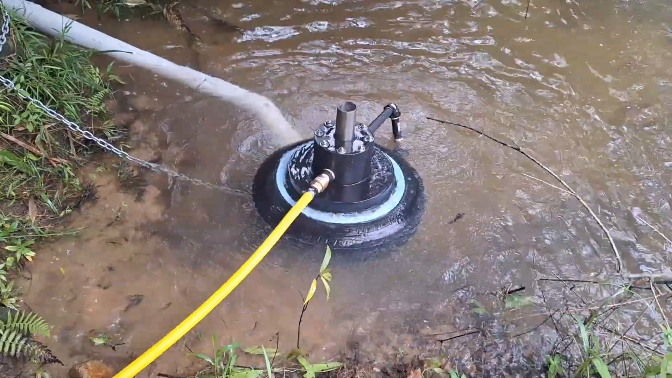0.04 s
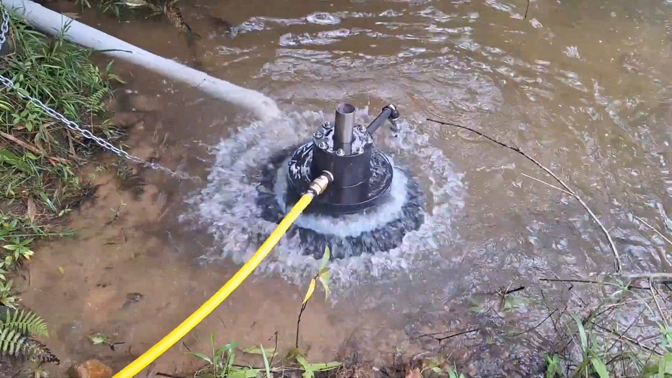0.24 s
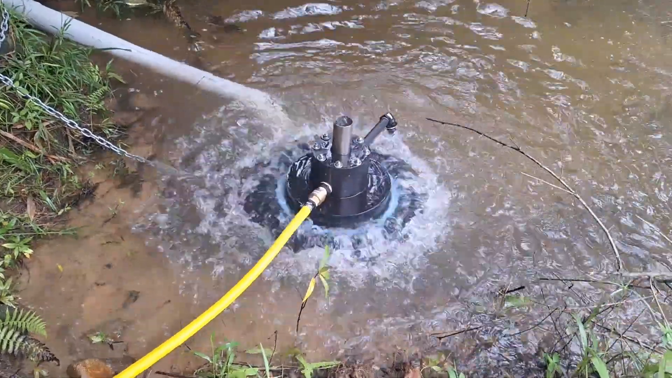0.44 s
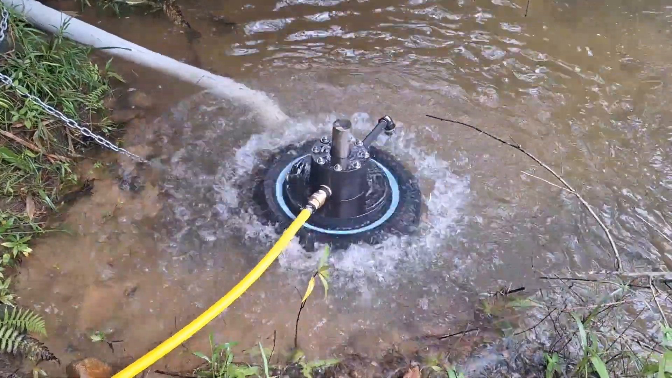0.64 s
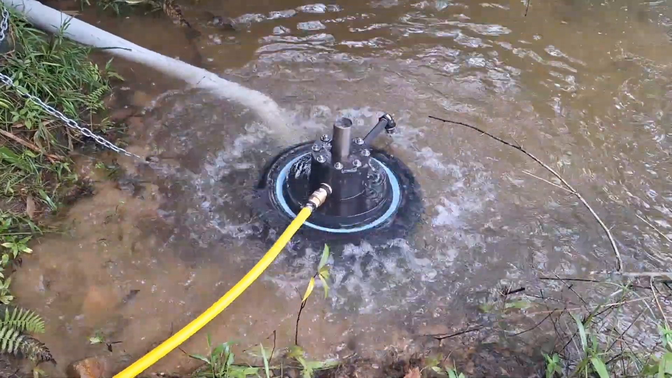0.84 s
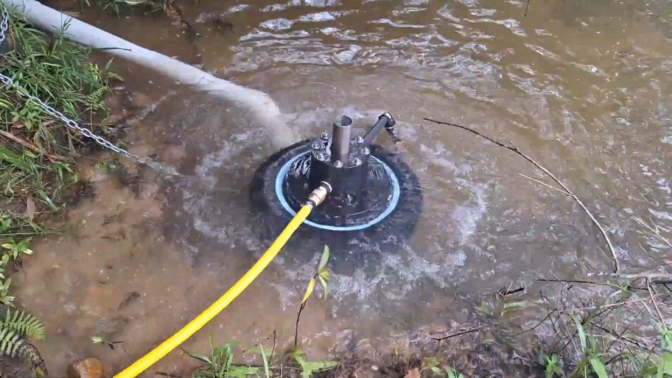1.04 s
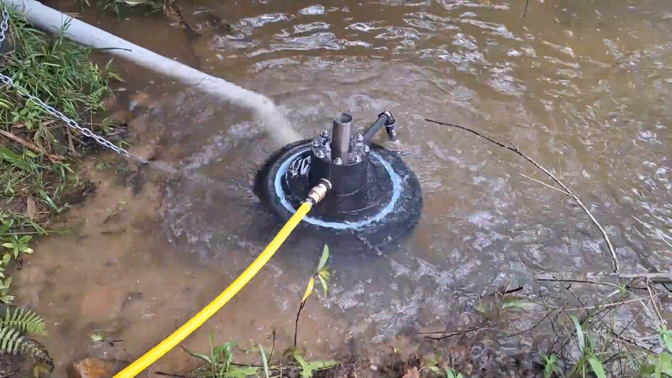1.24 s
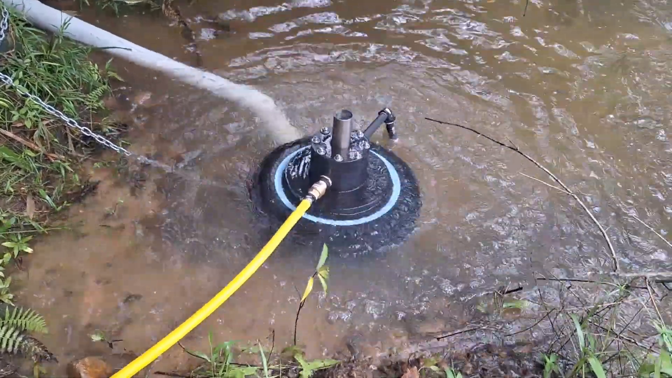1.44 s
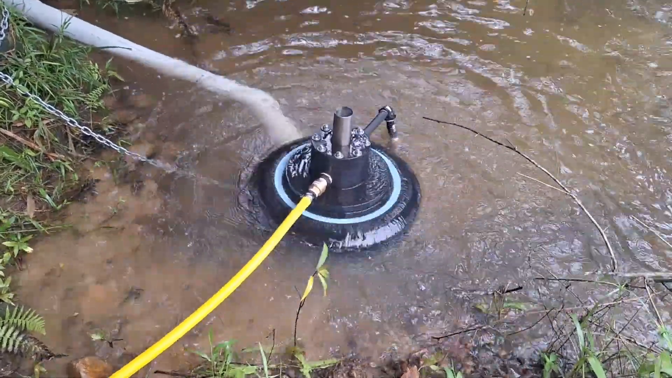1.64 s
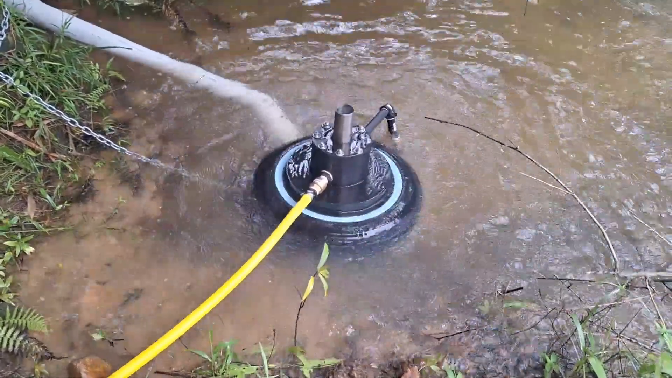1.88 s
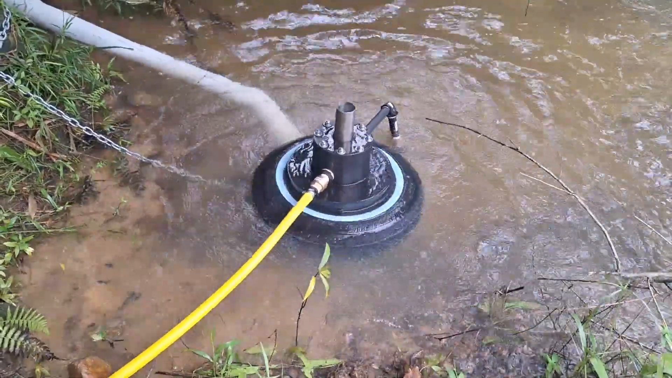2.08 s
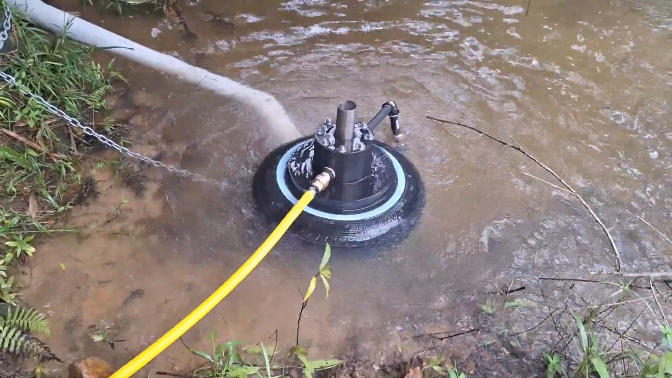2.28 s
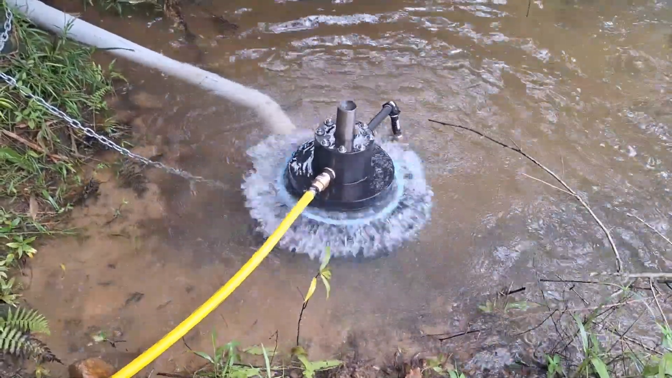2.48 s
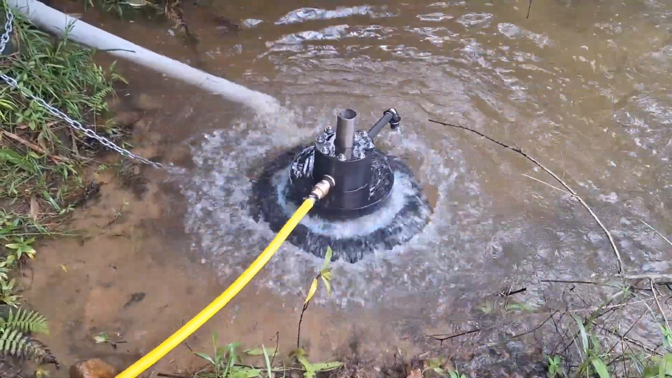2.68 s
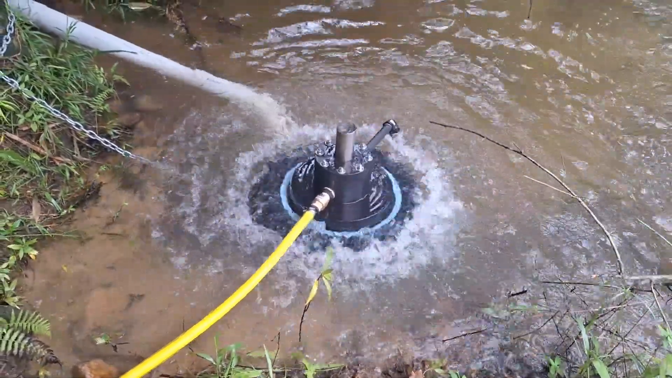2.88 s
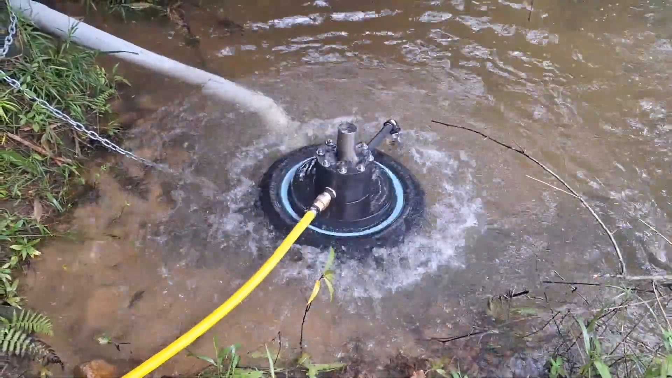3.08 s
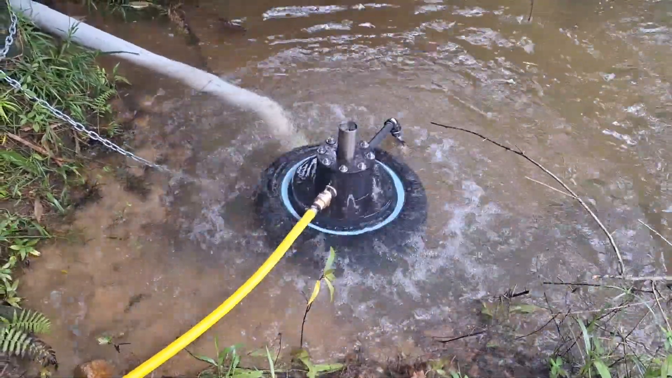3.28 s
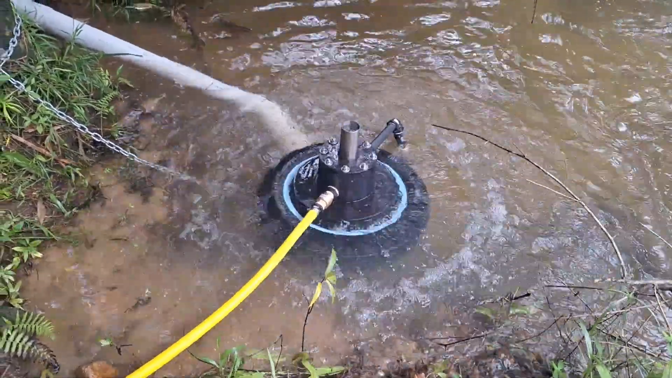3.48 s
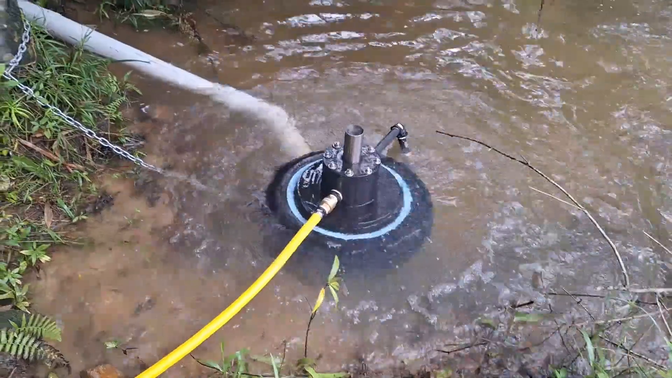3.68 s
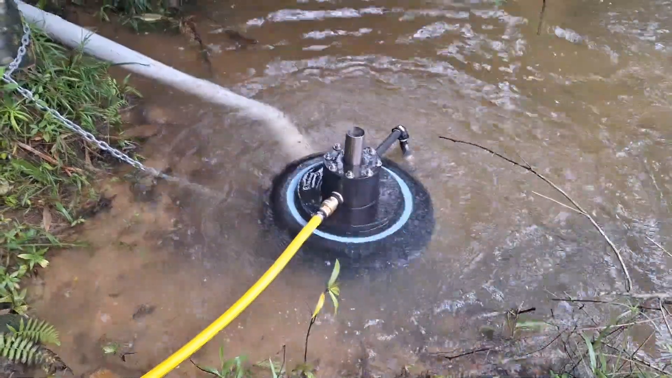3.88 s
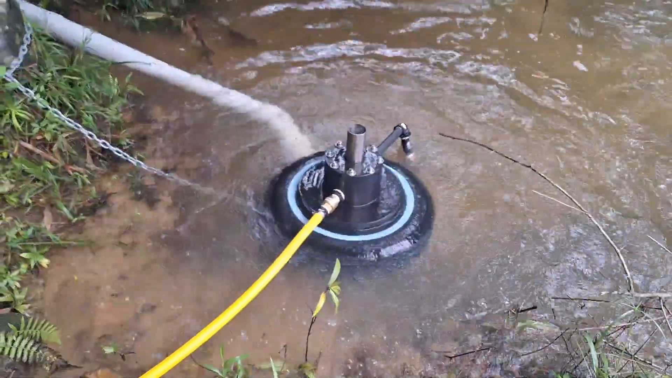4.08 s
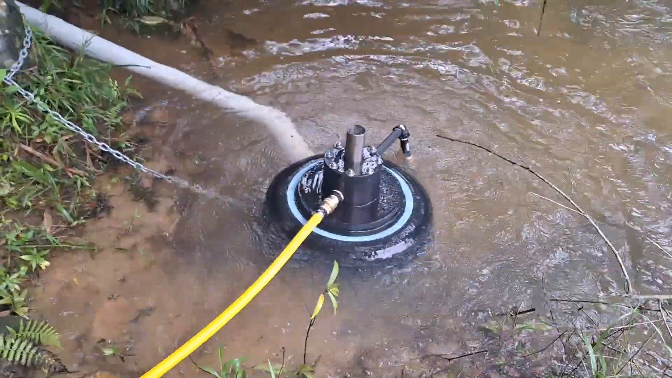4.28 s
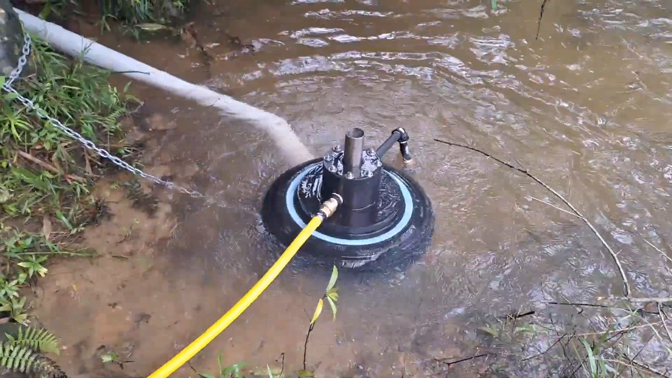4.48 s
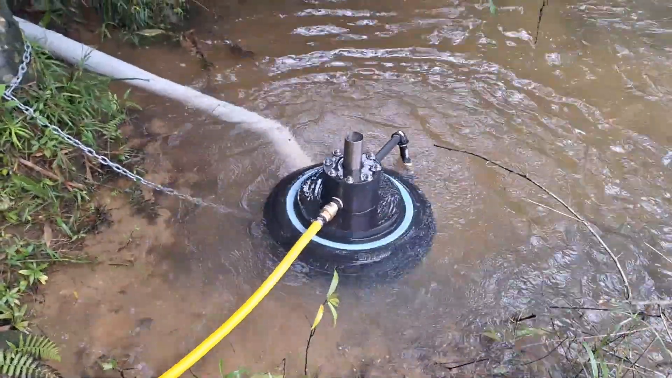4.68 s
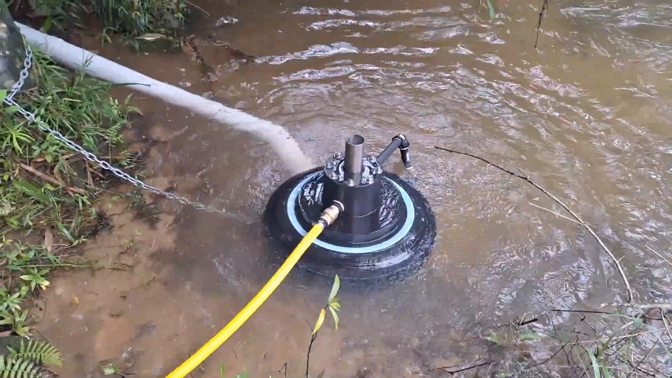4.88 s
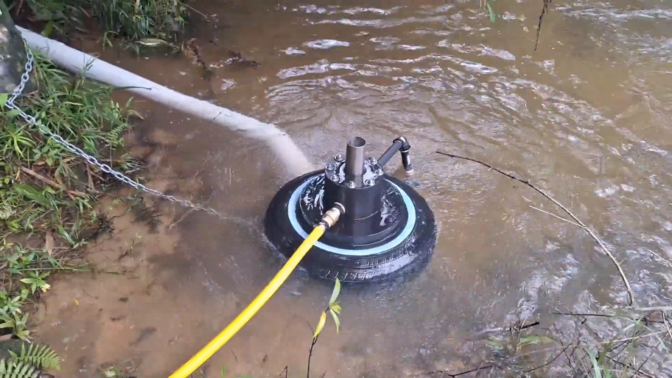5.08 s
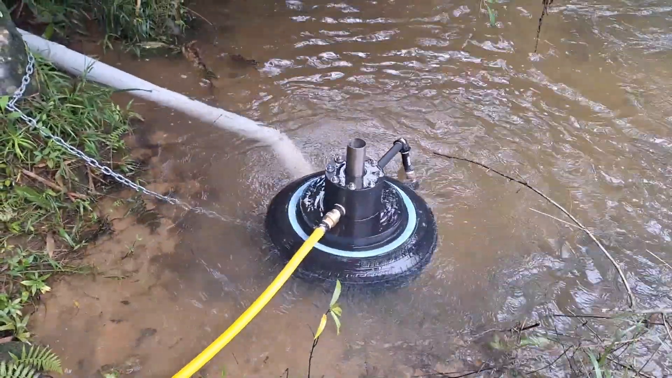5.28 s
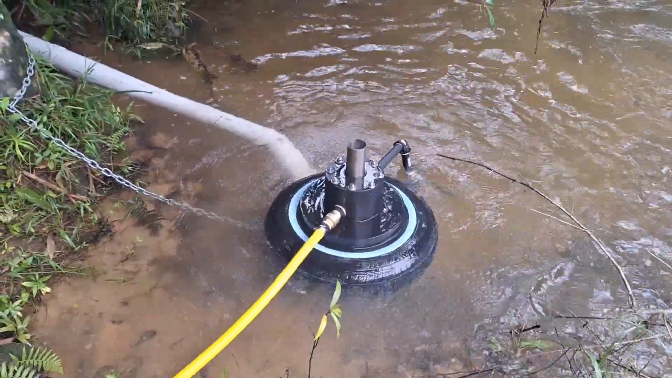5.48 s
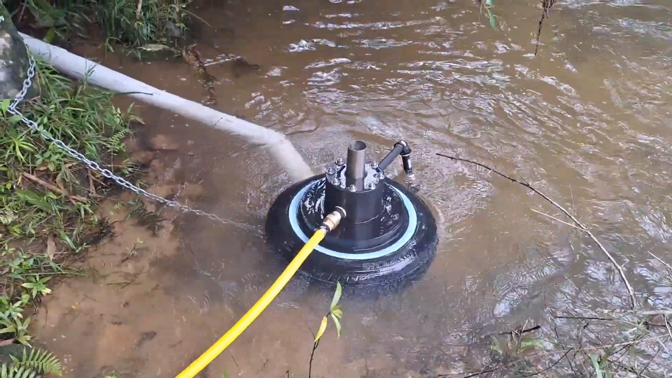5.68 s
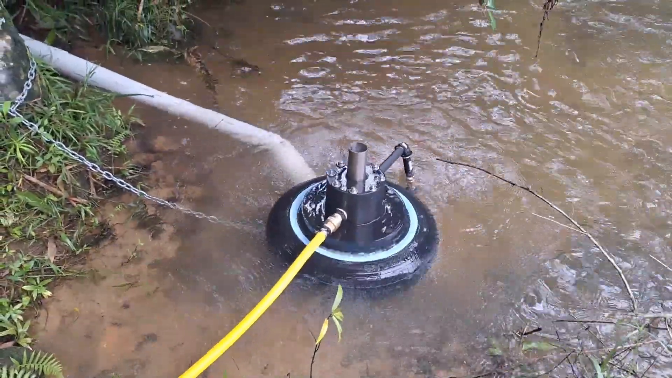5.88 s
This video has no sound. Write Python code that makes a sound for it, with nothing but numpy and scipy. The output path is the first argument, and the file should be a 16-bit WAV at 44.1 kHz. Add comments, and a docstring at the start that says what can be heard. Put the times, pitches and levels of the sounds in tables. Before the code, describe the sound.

A water-driven pump sits in a stream, heard close and centred. A short swelling hiss leads into a dull metallic double knock and a splashy whoosh, then descending hollow gulps and falling droplets. After a pause of plain running water, a second stroke comes with a slightly softer rebound and finer spray. The rest is steady, burbling, hissing creek, in open air with only faint reflections from the bank.

```python
"""Water spurts from the waste valve of a hydraulic ram pump in a creek, over the steady rush of a riffle.
The valve slams as a ring of damped modes, and jets of shaped noise and bubbles burst out; the pump cycles twice.
Air pockets gulp as gliding damped sines, and the thrown water patters back as dense swarms of bubbles.
The riffle, off to the right, sums bubble swarms and noise; the microphone ports ring near 8 kHz."""
import sys
import numpy as np
from scipy.fft import rfft, irfft, next_fast_len
from scipy.io import wavfile
from scipy.ndimage import map_coordinates

SR = 44100
rng = np.random.default_rng(int(sys.argv[2]) if len(sys.argv) > 2 else 0)


def inscribe(sig):
    """Save sig as 16-bit PCM at rate SR to the path in sys.argv[1].

    A 1-D sig is mono; a 2-D sig holds one channel per row.
    Samples are clipped to [-1, 1] before scaling.
    """
    pcm = np.round(np.clip(np.atleast_2d(sig).T, -1, 1) * 32767)
    wavfile.write(sys.argv[1], SR, pcm.astype(np.int16))


N = 261832


def amp(db):
    """Logarithmic level: decibels become an amplitude gain."""
    return 10 ** (np.asarray(db) / 20)


def unit(x):
    """Root-mean-square normalization: scale to rms 1."""
    return x / np.sqrt(np.mean(x ** 2) + 1e-20)


def clock():
    """Uniform sampling: the time of every sample in seconds."""
    return np.arange(N) / SR


def along(points, hz):
    """Interpolation on a logarithmic frequency axis, from (Hz, value) points."""
    point_hz, values = np.transpose(points)
    return np.interp(np.log(hz + 1), np.log(point_hz + 1), values)


def curves(rows):
    """Linear interpolation in time: one curve for each column after the time."""
    s, *columns = np.transpose(rows)
    return [np.interp(clock(), s, column) for column in columns]


def wobble(rate):
    """Slow random modulation: a smooth curve through rate random knots a second."""
    knots = rng.standard_normal(int(N * rate / SR) + 4)
    return map_coordinates(knots, [np.arange(N) * rate / SR])


def filtered(x, response):
    """Linear filtering: the spectrum of x times a complex response of frequency."""
    m = next_fast_len(N + SR // 2)
    return irfft(rfft(x, m) * response(np.fft.rfftfreq(m, 1 / SR)), m)[..., :N]


def add(track, s, sound):
    """Superposition: mix a sound into a track at time s."""
    start = max(round(s * SR), 0)
    track[..., start:start + sound.shape[-1]] += sound[..., :max(N - start, 0)]


def bubbles(count, low_hz, high_hz, cycles, spread_db):
    """Bubble resonance: each of a swarm falls 60 dB in the given cycles while its pitch rises."""
    when, pitch, chance = rng.random((count, 3)).T[..., None]
    hz = low_hz * (high_hz / low_hz) ** pitch
    # the longest ring is capped to bound the memory of a large swarm
    t = np.arange(min(int(cycles / low_hz * SR), 4_000_000 // count)) / SR
    age = t * hz / cycles
    # a few bubbles are much louder than the rest
    size = amp(spread_db * np.minimum(-np.log(1 - chance), 4)) * hz
    ring = size * amp(-60 * age) * np.sin(2 * np.pi * hz * t * (1 + age / 10))
    position = (when * N).astype(int) + np.arange(len(t))
    return unit(np.bincount(position.ravel(), ring.ravel(), N)[:N])


def water(share, count, low_hz, high_hz, cycles, spread_db):
    """Power sharing: in two unrelated streams, bubbles replace a share of the noise power in a band."""
    share = np.clip(share, 0, 1)
    grains = np.array([bubbles(count, low_hz, high_hz, cycles, spread_db) for _ in range(2)])
    noise = rng.standard_normal((2, N))
    blur = filtered(noise, lambda hz: np.sqrt(1 - share * ((hz > low_hz) & (hz < high_hz))))
    return np.sqrt(share * 2 * (high_hz - low_hz) / SR) * grains + blur


def stereo(pair, spectrum, alike):
    """Interchannel coherence: colour two streams and blend them by likeness, at rms 1."""
    def blend(hz):
        turn = np.arccos(np.clip(along(alike, hz), -1, 1)) / 2
        return amp(along(spectrum, hz)) * np.array([np.cos(turn), np.sin(turn)])

    mid, side = filtered(pair, blend)
    return unit(np.array([mid + side, mid - side]))


# pump strokes: slam_s, spurt_rise_s, burst_rise_s, rebound_delay_s, rebound_db (relative to the slam),
# mist_db (added to the mist of every jet)
PUMP_STROKES = [(0.162, .01, 0.0023, .044, -5, -1.2), (2.523, .03, .008, .022, -12, .9)]
# modes of the valve housing: mode_hz, level_db (relative, before a small random spread), t60_s
HOUSING_MODES = [(520, -4, 0.091), (1040, 5.5, 0.048), (1360, -5, .07), (1553, 3.5, 0.05), (1930, 7, 0.059),
                 (2260, -8, .06), (2866, -1, 0.052), (3790, -56, .03)]
SLAM_DB = -23.5


def valve():
    """Modal impact: the valve hits its seat and rebounds once; water damps the housing's modes."""
    out, t = np.zeros((2, N)), np.arange(SR // 4) / SR
    for slam, _, _, rebound, rebound_db, _ in PUMP_STROKES:
        for s, db in [(slam, SLAM_DB), (slam + rebound, SLAM_DB + rebound_db)]:
            ring = 0
            for hz, level, t60 in HOUSING_MODES:
                decay = amp(level + rng.normal(0, 0.96) - 60 * t / t60)
                phase = rng.normal(0, 0.55, (2, 1))  # differs between the channels
                ring = ring + decay * np.sin(2 * np.pi * hz * t + phase)
            crack = .8 * amp(-60 * t / .008) * rng.standard_normal((2, len(t)))
            onset = 1 - np.exp(-t / 0.0012)
            add(out, s, amp(db) * (ring + crack) * onset)
    return out


# spectrum of the jet: frequency_hz, relative_level_db (per Hz)
JET_SPECTRUM = [(100, -37), (400, -19), (850, 0.5), (1200, -2.5), (1580, 1), (2150, 1.5), (2900, -6.5),
                (4500, -14), (8000, -20), (16000, -26)]
# spectrum of the churned pool: frequency_hz, relative_level_db (per Hz)
CHURN_SPECTRUM = [(28, -36), (72, -15), (140, -9), (280, 4), (560, 6), (900, -2), (2000, -17), (5000, -42)]
# spectrum of the bright part of a jet: frequency_hz, relative_level_db (per Hz)
MIST_SPECTRUM = [(1200, -33), (2600, 2), (3400, 3.5), (4400, 5), (5600, 0), (8000, -4), (10000, -4.5),
                 (16000, -5.5)]
# likeness of the two channels near the pump: frequency_hz, likeness (0-1)
PUMP_LIKENESS = [(150, 0.85), (600, 1), (1200, 0.7), (2000, 0.31), (3000, 0.061), (7000, .02)]
# three jets a stroke: level_db, hold_s, t60_s, churn_db and mist_db (both relative to the jet)
SPURT = (-25.8, .008, .3, -20, -4.8)
BURST = (-19.5, .014, .27, -10.5, -5)
SURGE = (-23.4, .008, 0.36, -7, -.3)
SPURT_LEAD_S, SURGE_RISE_S = 0.072, 0.014  # the spurt peaks before the slam; the surge follows the rebound


def jets():
    """Turbulent jet noise: spurt, burst at the slam and surge at the rebound tear into mist and churn the pool."""
    power = np.zeros((3, N))
    for slam, spurt_rise, burst_rise, rebound, _, stroke_mist_db in PUMP_STROKES:
        stroke_jets = [(slam - SPURT_LEAD_S, spurt_rise, SPURT),
                       (slam + burst_rise / 2, burst_rise, BURST),
                       (slam + rebound + SURGE_RISE_S / 2, SURGE_RISE_S, SURGE)]
        for peak, rise, (db, hold, t60, churn_db, mist_db) in stroke_jets:
            t = clock() - peak
            fall_db = 60 * np.maximum(t - hold, 0) / t60
            swell = amp(db - fall_db) * np.exp(np.minimum(t, 0) / rise)
            parts_db = [[0], [churn_db], [mist_db + stroke_mist_db]]
            power += (amp(parts_db) * swell) ** 2  # overlapping jets add in power
    force, digging, tearing = np.sqrt(power)
    jet_water = water(share=0.33, count=9000, low_hz=596, high_hz=3450, cycles=12.0, spread_db=1)
    mist_water = water(share=0.69, count=9000, low_hz=2600, high_hz=15200, cycles=3.3, spread_db=4.0)
    jet = stereo(jet_water, JET_SPECTRUM, PUMP_LIKENESS)
    churn = stereo(rng.standard_normal((2, N)), CHURN_SPECTRUM, PUMP_LIKENESS)
    mist = stereo(mist_water, MIST_SPECTRUM, PUMP_LIKENESS)
    return jet * force + churn * digging + mist * tearing


# single large air pockets breaking loose: start_s, pitch_hz (at the start), level_db
AIR_POCKETS = [(0.197, 83, -22.5), (0.424, 270, -27), (0.462, 227, -27.5), (0.608, 113, -29),
               (2.628, 80, -30), (2.846, 183, -31), (2.957, 88, -30), (2.975, 610, -25), (3.021, 835, -28),
               (4.672, 70.6, -32), (5.908, 286, -30)]
# the hollow round the pump closes in a run of gulps, each larger and so lower than the last
GULP_HZ, GULP_PITCH_RATIO, GULP_GAP_S = 294, .785, .042
GULP_DB, GULP_LOSS_DB = -21.5, 1.4
POCKET_T60_S, POCKET_RISE_OCT_PER_S = 0.12, .4  # t60 of a 200 Hz pocket; higher ones die sooner


def pockets():
    """Air-cavity resonance: trapped air rings with a soft start and rising pitch, gulping from each rebound."""
    gulps = [(slam + rebound + k * GULP_GAP_S, GULP_HZ * GULP_PITCH_RATIO ** k, GULP_DB - k * GULP_LOSS_DB)
             for slam, _, _, rebound, *_ in PUMP_STROKES for k in range(3)]
    out, t = np.zeros(N), np.arange(SR // 3) / SR
    for s, hz, db in gulps + list(AIR_POCKETS):
        t60 = POCKET_T60_S * np.sqrt(200 / hz)
        phase = 2 * np.pi * np.cumsum(hz * 2 ** (POCKET_RISE_OCT_PER_S * t)) / SR
        onset = (1 - np.exp(-t * hz / .5)) ** 2
        add(out, s, amp(db - 60 * t / t60) * onset * np.sqrt(2) * np.sin(phase))
    return out


def shower(db, delay, rise, hold, fade_db_per_s):
    """Envelope of falling water: after each slam it sets in, holds and thins out exponentially."""
    gain = np.zeros(N)
    for slam, *_ in PUMP_STROKES:
        t = clock() - slam - delay
        gain += np.clip(t / rise, 0, 1) * amp(db - fade_db_per_s * np.maximum(t - hold, 0))
    return gain


# spectrum of the landing drops: frequency_hz, relative_level_db (per Hz)
PATTER_SPECTRUM = [(40, -30), (120, -16), (250, -4), (430, -7), (600, -0.5), (750, -3), (1000, 3),
                   (1270, -1.5), (1560, 4), (2400, -3), (3200, -19), (7000, -25), (16000, -45)]
# spectrum of the fine spray: frequency_hz, relative_level_db (per Hz)
SPRAY_SPECTRUM = [(800, -18), (2500, 5.5), (4500, 4), (6200, -0.5), (8000, -7), (10000, -2), (16000, -2)]
# likeness of the two channels over the pool: frequency_hz, likeness (0-1)
POOL_LIKENESS = [(150, 0.75), (500, 1), (900, 0.64), (1800, 0.27), (3000, 0.0048), (7000, 0.11)]
# the largest sheets of water slapping the pool: start_s, level_db (before the onset)
SHEET_SLAPS = [(0.323, -30), (0.348, -30), (0.418, -24.5), (0.482, -31), (0.569, -30), (0.932, -32),
               (2.695, -32), (2.828, -29), (2.869, -29), (2.935, -30)]
# falling water: level_db, delay_s (slam to first landing), rise_s, hold_s (from first landing), fade_db_per_s
PATTER_FALL = (-30.5, .07, 0.07, .31, 50)
SPRAY_FALL = (-30.8, 0.12, .015, 0.12, 27)
SLOSH_DB = -40  # gulps among the falling water


def fallback():
    """Droplet impact: thrown water lands in clumps and slapping sheets, with spray above and slosh below."""
    patter_water = water(share=0.62, count=7000, low_hz=401, high_hz=3590, cycles=20, spread_db=3.0)
    spray_water = water(share=0.44, count=7000, low_hz=2580, high_hz=15000, cycles=5.8, spread_db=3.0)
    patter = stereo(patter_water, PATTER_SPECTRUM, POOL_LIKENESS)
    spray = stereo(spray_water, SPRAY_SPECTRUM, POOL_LIKENESS)
    slosh = bubbles(count=300, low_hz=160, high_hz=600, cycles=27, spread_db=2)
    sheets, t = np.zeros(N), np.arange(SR // 6) / SR
    for s, db in SHEET_SLAPS:
        add(sheets, s, amp(db - 60 * t / 0.052) * (1 - np.exp(-t / 0.0023)))
    # random gains gather the drops into clumps
    drops = patter * shower(*PATTER_FALL) * amp(1.6 * wobble(50))
    fine_drops = spray * shower(*SPRAY_FALL) * amp(.7 * wobble(50))
    slaps = sheets * (patter + amp(-4) * spray)
    return drops + fine_drops + slaps + slosh * shower(SLOSH_DB, *PATTER_FALL[1:])


# the riffle's slow swells about their means: time_s, gurgle_swell_db, fizz_swell_db
RIFFLE_SWELLS = [(0.0, -0.5, 0), (0.9, -0.5, -2.5), (1.55, -3, -2.0), (2.05, 3, 0), (2.3, -0.5, 0.5),
                 (3.3, -1.2, -3), (3.95, -1.5, -0.8), (4.35, -0.4, 1.9), (5.25, 1.8, 2.5), (5.7, 0, 2.5),
                 (5.92, 3, 2.5)]
# spectrum of the deep gurgling: frequency_hz, relative_level_db (per Hz)
GURGLE_SPECTRUM = [(20, -46), (33, -30), (48, -18), (63, 1.5), (88, -0.5), (120, -2.5), (200, -3),
                   (305, -1.5), (360, -7), (410, -3.5), (520, -16.5), (1200, -30.5)]
# spectrum of the burbling body: frequency_hz, relative_level_db (per Hz)
BODY_SPECTRUM = [(120, -36), (300, -9.5), (520, -3.5), (670, -1.5), (930, -2), (1100, -3.5), (1370, -6),
                 (1800, -2.5), (2400, -6.5), (3200, -14), (6000, -13), (10000, -35)]
# spectrum of the bursting foam: frequency_hz, relative_level_db (per Hz)
FIZZ_SPECTRUM = [(800, -15), (2400, -2.5), (3500, -4), (4700, -3), (6100, -6), (6950, -1.5), (7400, -0.5),
                 (7880, 2.5), (9000, -5.5), (12500, -6.5), (14000, -9.5), (16000, -5.5)]
# likeness of the two channels in the riffle: frequency_hz, likeness (0-1)
RIFFLE_LIKENESS = [(150, 0.86), (450, 0.82), (700, 0.67), (1100, 0.86), (2000, 0.62), (3000, 0.23),
                   (4500, 0.56), (7000, 0), (14000, 0)]
# shading in the riffle's direction: frequency_hz, left_minus_right_db
RIFFLE_SHADING = [(80, 2.5), (500, 0), (1800, 2.5), (3300, 1.2), (4400, 3), (6100, 5.5), (7600, 2),
                  (9800, 1), (12000, -10), (16000, -5)]
GURGLE_DB, BODY_DB, FIZZ_DB = -39.6, -35, -33.9  # mean levels
BODY_FOLLOWS = 0.28  # share of the fizz's swell in dB that the burbling body takes


def riffle():
    """Entrained-air noise: a creek over stones gurgles, burbles, trickles and fizzes with bursting foam."""
    gurgle_swell, fizz_swell = curves(RIFFLE_SWELLS)
    gurgle_water = water(share=0.46, count=900, low_hz=59.1, high_hz=584, cycles=13.8, spread_db=2.5)
    burble = water(share=0.49, count=7000, low_hz=300.4, high_hz=3215, cycles=25.6, spread_db=2.0)
    # a few bubbles close to the surface ring on for longer
    trickle = np.array([bubbles(count=800, low_hz=401.3, high_hz=1599, cycles=61, spread_db=1.7)
                        for _ in range(2)])
    fizz_water = water(share=0.43, count=14000, low_hz=2500, high_hz=15800, cycles=4.3, spread_db=1.5)
    gurgle = stereo(gurgle_water, GURGLE_SPECTRUM, RIFFLE_LIKENESS)
    body = stereo(burble + amp(-17.5) * trickle, BODY_SPECTRUM, RIFFLE_LIKENESS)
    fizz = stereo(fizz_water, FIZZ_SPECTRUM, RIFFLE_LIKENESS)
    rush = gurgle * amp(GURGLE_DB + gurgle_swell)
    rush += body * amp(BODY_DB + BODY_FOLLOWS * fizz_swell + 0.32 * wobble(8.1))
    rush += fizz * amp(FIZZ_DB + fizz_swell + 0.33 * wobble(18))
    return heard_from(rush, RIFFLE_SHADING, left_lag=0.00042)


def heard_from(x, shading, left_lag):
    """Directional hearing: the left lags by left_lag seconds and the microphones' casing shades each side."""
    half = np.array([[.5], [-.5]])
    return filtered(x, lambda hz: amp(half * along(shading, hz)) * np.exp(-2j * np.pi * hz * half * left_lag))


def bank(x, echo_db):
    """Diffuse reflection: stones and the bank send back a scatter of weak, dull echoes."""
    delay, size = rng.uniform(.004, .04, 12), rng.standard_normal(12)
    echoes = np.zeros((2, N))
    for s, gain in zip(delay, size / np.linalg.norm(size)):
        add(echoes, s, gain * x)
    return x + amp(echo_db) * filtered(echoes, lambda hz: 1 / (1 + 1j * hz / 5000))


# shading in the pump's direction: frequency_hz, left_minus_right_db
PUMP_SHADING = [(80, 3), (1000, 0), (1900, 2), (2400, 8), (4200, 0.5), (5900, 10.5), (8600, 6.5),
                (10500, -2), (12300, -9), (16000, -1)]


def scene():
    """Superposition of sources: the pump straight ahead, the riffle to the right, each with its echoes."""
    pump = valve() + jets() + pockets() + fallback()
    pump = heard_from(pump, PUMP_SHADING, left_lag=-0.00006)
    return bank(pump, echo_db=-13.5) + bank(riffle(), echo_db=-18.5)


# resonance of the microphone ports: frequency_hz, gain_db
PORT_RESONANCE = [(6200, 1), (7300, 6.5), (7950, 7.5), (8450, 4), (9100, -1.5), (16000, -3.5)]
TOP_HZ = 15900  # band limit


def record(dry):
    """Port resonance: the microphone ports colour the treble, and nothing is kept above the band limit."""
    return filtered(dry, lambda hz: amp(along(PORT_RESONANCE, hz)) * (hz < TOP_HZ))


dry = scene()
out = record(dry)
inscribe(out)
```